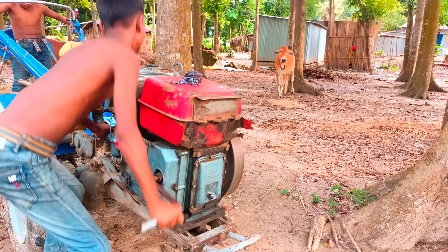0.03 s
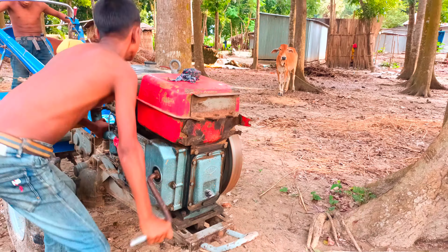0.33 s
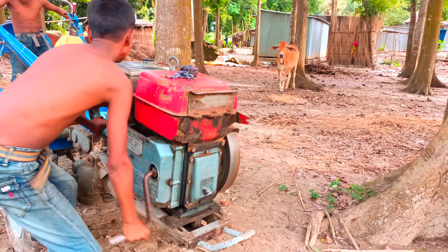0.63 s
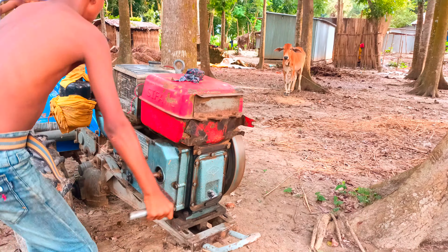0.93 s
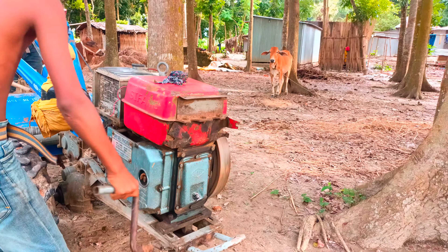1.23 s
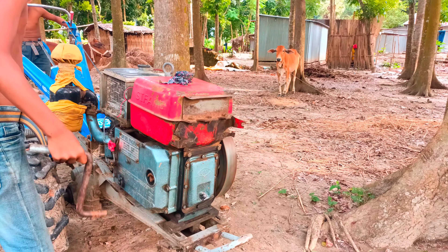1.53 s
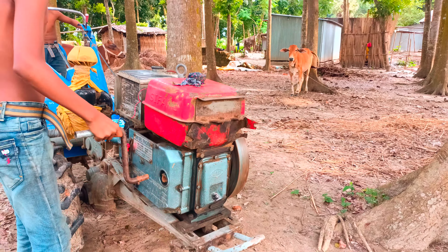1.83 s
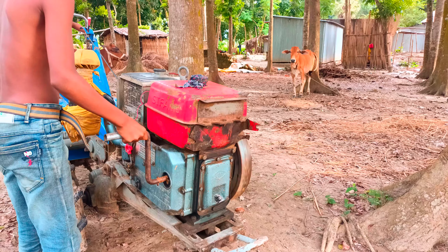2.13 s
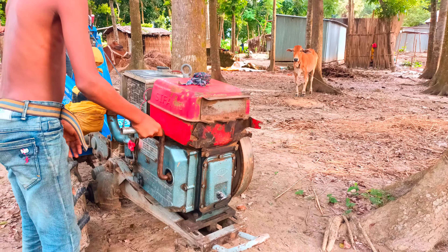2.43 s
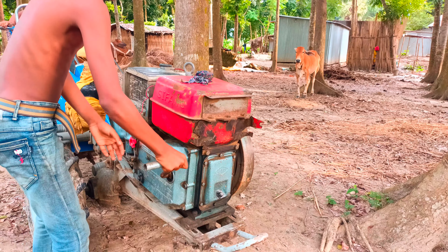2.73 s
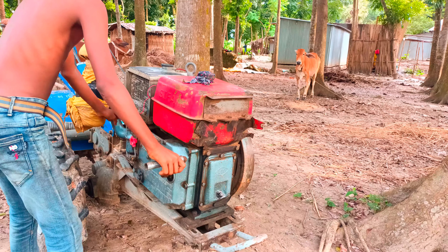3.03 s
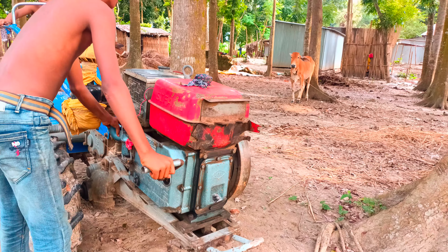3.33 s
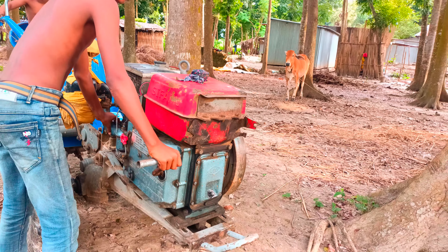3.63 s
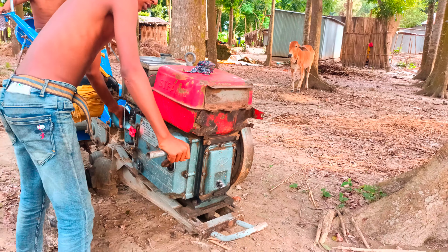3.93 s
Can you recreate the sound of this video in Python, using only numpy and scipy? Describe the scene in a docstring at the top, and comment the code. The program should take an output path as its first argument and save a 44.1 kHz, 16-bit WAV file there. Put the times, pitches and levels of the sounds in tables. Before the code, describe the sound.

Close up in a yard, a steel crank squeaks and knocks as it turns over an engine without starting it. The rumble fades, the crank is reseated with a ringing clack, and faint bird chirps and insect buzz remain.

```python
"""A dry hand crank squeals and chatters in its socket, turning a single-cylinder engine that does not fire.
Steel sticks and slips for the squeals; knocks rattle the socket and thud in the casing, which the gear
teeth shake into a rumble. The crank is pulled out, the flywheel runs down with a faintly singing bearing,
and the crank clacks back into place, ringing. In the village yard around it, insects buzz in fast pulses
and a small bird chirps in falling sweeps."""
import sys
import numpy as np
from scipy import signal
from scipy.fft import rfft, irfft
from scipy.io import wavfile

SR = 44100
rng = np.random.default_rng(int(sys.argv[2]) if len(sys.argv) > 2 else 0)


def to_wav(sig):
    """Store sig (one row per channel, or 1-D mono) as 16-bit WAV at the path in sys.argv[1].

    Samples outside -1..1 are clipped; the rate is SR.
    """
    pcm = np.clip(np.atleast_2d(sig), -1, 1) * 32767
    pcm = np.round(pcm).astype(np.int16)
    wavfile.write(sys.argv[1], SR, pcm.T)  # frames by channels


N = 176400
CONTACTS_PER_S = 2500


def from_db(db):
    """Decibels to gain."""
    return 10 ** (np.asarray(db) / 20)


def unit_rms(x):
    """Scale to unit power."""
    return x / np.sqrt(np.mean(x ** 2) + 1e-20)


def clock(size=N):
    """Sample times in seconds."""
    return np.arange(size) / SR


def at_hz(points, hz):
    """Read a table on a log-frequency axis."""
    table_hz, value = np.transpose(points)
    return np.interp(np.log(np.maximum(hz, 1)), np.log(table_hz), value)


def colour(x, spectrum, tilt_db_per_oct=0):
    """Apply a spectrum and a tilt; unit power."""
    hz = np.maximum(np.fft.rfftfreq(x.shape[-1], 1 / SR), 20)
    gain = from_db(at_hz(spectrum, hz) + tilt_db_per_oct * np.log2(hz))
    return unit_rms(irfft(rfft(x) * gain, x.shape[-1]))


def drift(corner_hz, shape):
    """Low-passed random wander; unit power."""
    hz = np.fft.rfftfreq(shape[-1], 1 / SR)
    return unit_rms(irfft(rfft(rng.standard_normal(shape)) / (1 + (hz / corner_hz) ** 2), shape[-1]))


def envelope(t, length_s, rise_s, fall_s):
    """Linear rise, hold until length_s, exponential fall."""
    return np.clip(t / rise_s, 0, 1) * np.exp(-np.maximum(t - length_s, 0) / fall_s)


def add(out, start_s, x):
    """Mix in a short sound."""
    i = max(int(start_s * SR), 0)
    out[:, i:i + x.shape[-1]] += x[..., :N - i]


def ring(x, hz, t60_s):
    """One mode as a two-pole resonator."""
    radius, angle = from_db(-60 / (t60_s * SR)), 2 * np.pi * hz / SR
    return signal.lfilter([0, np.sin(angle)], [1, -2 * radius * np.cos(angle), radius ** 2], x + 1e-18)


def body(x, modes):
    """Drive a table of modes in alternating polarity; unit power."""
    return unit_rms(sum((-1) ** i * from_db(db) * ring(x, hz, t60_s) / np.sqrt(t60_s)
                        for i, (hz, db, t60_s) in enumerate(modes)))


def contacts(per_s, size=N):
    """Random small impacts, of different strength at each ear."""
    return unit_rms((rng.random(size) < per_s / SR) * rng.standard_normal((2, size)))


def scatter(x, decay_s):
    """A fast-dying spray of reflections of x for each ear."""
    t = clock(SR // 20)
    spray = unit_rms(rng.standard_normal((2, len(t))) * np.exp(-t / decay_s)) / np.sqrt(len(t))
    return signal.fftconvolve(x, spray, axes=1)[:, :N]


# Likeness of the ears: (frequency [Hz], left-right correlation [0-1])
EAR_CORRELATION = [(25, 0.58), (65, 0.64), (130, 1), (450, 0.91), (1000, 0.61), (2000, 0.071),
                   (5000, 0.059), (15000, 0)]


def spread(pair):
    """Blend two unrelated signals so that the ears agree in the lows only."""
    correlation = at_hz(EAR_CORRELATION, np.fft.rfftfreq(N, 1 / SR))
    angle = np.arcsin(np.clip(correlation, -.99, .99)) / 2
    spectra = rfft(pair)
    return irfft(spectra * np.cos(angle) + spectra[::-1] * np.sin(angle), N)


# Outdoor hush: (frequency [Hz], level [dB])
AIR_SPECTRUM = [(25, 1.5), (70, -3), (130, -6.5), (400, -10), (900, -22), (1600, -25.5), (2200, -15),
                (2600, -14), (4000, -14.5), (5500, -14.5), (6500, -19.5), (12000, -27), (16000, -24)]


def air(hush_db=-57, tone_db=-76):
    """Outdoor hush with a faint, wavering far-off tone."""
    hush = spread(colour(rng.standard_normal((2, N)), AIR_SPECTRUM))
    tone = unit_rms(ring(rng.standard_normal((2, N)), hz=2196, t60_s=.017))
    return from_db(hush_db) * hush + from_db(tone_db + 3 * drift(3.4, (N,))) * tone


# Insect buzz: (frequency [Hz], level [dB])
INSECT_SPECTRUM = [(5000, -45), (6500, -12), (7400, -10.5), (8200, -6.5), (8800, -0.5), (9250, -3.5),
                   (9800, -10), (10900, -13), (12000, -18), (15000, -45)]


def insects(pulse_hz=327, buzz_db=-52, flutter_db=1.5, chorus_db=-55.5):
    """A high buzz of fast, slightly uneven pulses over the hiss of a farther chorus."""
    cycles = np.cumsum(pulse_hz * (1 + .005 * drift(60, (2, N))), axis=1) / SR
    pulses = sum(np.cos(2 * np.pi * (k * cycles + rng.random())) for k in range(22, 35))
    buzz = colour(pulses, INSECT_SPECTRUM) * from_db(flutter_db * drift(50, (2, N)))
    chorus = colour(rng.standard_normal((2, N)), INSECT_SPECTRUM)
    return from_db(buzz_db) * buzz + from_db(chorus_db) * chorus


# Near bird's notes: (time [s], start pitch [Hz], level [dB])
BIRD_NOTES = [(2.162, 5740, -43), (3.098, 6400, -50), (3.124, 6460, -45), (3.328, 5250, -51),
              (3.353, 5200, -53.5), (3.48, 5480, -49.5), (3.588, 6140, -39.5), (3.599, 5300, -44),
              (3.614, 5500, -38.5), (3.705, 5700, -44), (3.730, 5850, -38), (3.745, 5260, -40.5),
              (3.849, 6030, -46.5), (3.868, 5520, -38.5), (3.887, 5400, -37.5)]


def birds(note_s=.0167, drop_hz=1220, ear_phase_rad=2.24, scatter_db=3.5):
    """Quick falling notes, smeared by the trees; a farther bird chirps at random."""
    out, t = np.zeros((2, N)), clock(int(note_s * SR))
    far_notes = [(start_s, 5000, -55) for start_s in rng.uniform(1.35, 2.75, 12)]
    for start_s, start_hz, db in BIRD_NOTES + far_notes:
        hz = (start_hz - drop_hz * t / note_s) * (1 + .014 * drift(400, t.shape))
        phase = 2 * np.pi * np.cumsum(hz) / SR
        note = np.sin(np.pi * t / note_s) * np.sin([phase, phase - ear_phase_rad])
        add(out, start_s, from_db(db) * note)
    return out + from_db(scatter_db) * scatter(out, decay_s=.0061)


def yard_echo(x, t60_s=.27, gap_s=.004, lowpass_hz=4500):
    """Diffuse, dull echoes from trunks and sheds."""
    t = clock(SR // 2)
    tail = rng.standard_normal((2, len(t))) * from_db(-60 * t / t60_s) * (t > gap_s)
    tail = signal.sosfilt(signal.butter(1, lowpass_hz, fs=SR, output="sos"), tail)
    return signal.fftconvolve(x, unit_rms(tail) / np.sqrt(len(t)), axes=1)[:, :N]


# Deep rumble: (frequency [Hz], level [dB])
RUMBLE_SPECTRUM = [(25, -11.5), (55, -1), (80, -5.5), (120, -14.5), (250, -15), (600, -45), (4000, -81)]
# Course of the rumble: (time [s], level [dB])
RUMBLE_LEVELS = [(0, -68), (.7, -59), (1.2, -55), (1.5, -58), (2.3, -59.5), (2.9, -57), (3.149, -74),
                 (4, -72)]
# Dull bumps: (time [s], length [s], level [dB])
LOW_BUMPS = [(1.042, .03, -30.5), (1.769, 0.033, -40), (3.554, 0.031, -51.5)]


def rumble_and_bumps(bump_hz=78):
    """Deep noise with a few soft thumps, each a low tone plus a swell of that noise."""
    t = clock()
    rumble = spread(colour(rng.standard_normal((2, N)), RUMBLE_SPECTRUM))
    bump_gain = sum(from_db(db) * envelope(np.minimum(t - start_s, 1), length_s, .013, .0091)
                    for start_s, length_s, db in LOW_BUMPS)
    thump = np.sin(2 * np.pi * (bump_hz * t + rng.random())) + .49 * rumble
    return bump_gain * thump + from_db(np.interp(t, *np.transpose(RUMBLE_LEVELS))) * rumble


def bearing(start_s=2.176, level_db=-54.5):
    """A coasting bearing sings: light rubbing through one resonance."""
    tone = unit_rms(ring(spread(rng.standard_normal((2, N))), hz=1075, t60_s=.11))
    return from_db(level_db) * tone * envelope(clock() - start_s, length_s=.42, rise_s=.06, fall_s=.05)


# Steel contact: (frequency [Hz], level [dB])
STEEL_SPECTRUM = [(30, -71.5), (200, -25), (500, -10.5), (950, -0.5), (1500, -2), (2100, -1.5), (2750, 2.5),
                  (3600, -1), (5000, -1), (8500, -9), (12500, -14), (15500, -31.5)]
# Engine casing: (frequency [Hz], level [dB], t60 [s])
CASING_MODES = [(140.8, -5.5, 0.17), (192.3, -11, 0.11), (387, -9, 0.1), (461, -0.5, 0.17),
                (492, -1.5, 0.13), (565.3, -7.5, 0.0765), (798, -14, 0.14), (859, -8.5, 0.1205),
                (990, -13.5, 0.044), (1076, -21, 0.07), (1225, -10.5, 0.069), (1318, -15.5, 0.1)]
# Its crowded lesser modes: (frequency [Hz], level [dB])
WASH_SPECTRUM = [(30, -25.5), (70, -22), (130, -5), (350, -1.5), (700, -4.5), (1200, -4), (1500, -13),
                 (2400, -10.5), (5000, -20), (15000, -42.5)]
# Gear force, cranked and then running down: (time [s], level [dB])
GEAR_LEVELS = [(0, -32.5), (.5, -32), (.9, -32), (1.1, -34.5), (1.33, -43), (1.43, -47.5), (1.75, -46.5),
               (1.9, -50), (2.15, -50.5), (2.27, -51.5), (2.5, -50.5), (2.75, -56.5), (2.95, -71),
               (4, -70.5)]


def gears(teeth_per_s=1100, ticks_per_s=50, surge_db=2.5, modes_db=-1, wash_db=-5, tick_db=-13.5):
    """Meshing teeth shake the cast casing in uneven surges; loose parts tick."""
    force = from_db(np.interp(clock(), *np.transpose(GEAR_LEVELS)) + surge_db * drift(32, (N,)))
    modes = force.std() * body(force * spread(contacts(teeth_per_s)), CASING_MODES)
    wash = spread(colour(contacts(CONTACTS_PER_S), WASH_SPECTRUM))
    ticks = scatter(contacts(ticks_per_s)[:1], decay_s=.002)
    ticks = colour(ticks, STEEL_SPECTRUM, tilt_db_per_oct=-1.5)
    return from_db(modes_db) * modes + force * (from_db(wash_db) * wash + from_db(tick_db) * ticks)


def casing_thuds(knocks, lag_s=.00412, modes_db=1, wash_db=-5, highpass_hz=293):
    """The casing answers each knock a moment later."""
    t, force = clock(), np.zeros(N)
    for start_s, *_, thud_db in knocks:
        age_s = np.minimum(t - start_s - lag_s, .5)
        force += from_db(thud_db) * envelope(age_s, length_s=.022, rise_s=.013, fall_s=.014)
    modes = force.std() * body(force * spread(contacts(CONTACTS_PER_S)), CASING_MODES)
    wash = force * spread(colour(contacts(CONTACTS_PER_S), WASH_SPECTRUM))
    highpass = signal.butter(2, highpass_hz, "high", fs=SR, output="sos")
    return signal.sosfilt(highpass, from_db(modes_db) * modes + from_db(wash_db) * wash)


# Ringing crank: (frequency [Hz], level [dB], t60 [s])
CRANK_MODES = [(2550, -15, 0.089), (3410, -8.5, 0.062), (6800, -6.5, 0.067), (7670, 2.5, 0.11),
               (8840, 2, 0.055), (10400, -4.5, 0.043)]


def crank_seating(start_s=2.381, gain_db=-19, rise_s=.0025):
    """The steel crank rings as it seats."""
    out, t = np.zeros((2, N)), clock(SR // 5)
    for hz, db, t60_s in CRANK_MODES:
        tone = np.sin(2 * np.pi * (hz * t + rng.random((2, 1)) / 4))
        decay = envelope(t, rise_s, rise_s, fall_s=t60_s / np.log(1000))
        add(out, start_s, from_db(gain_db + db) * tone * decay)
    return spread(out)


# Short resonances of crank and socket: (frequency [Hz], level [dB], t60 [s])
SOCKET_MODES = [(861.7, -1.5, 0.21), (986, 1, 0.046), (1192, -4, 0.078), (1664, -0.5, 0.057),
                (2198, 0.5, 0.052), (2574, 5.5, 0.07), (2743, -5.5, 0.086), (3330, -7, .04),
                (4110, -11.5, 0.039), (4760, -3.5, .03), (5700, -22.5, .04), (6360, 6, 0.023)]
# Steel knocks and scrapes: (time [s], length [s], rattle [dB], tilt [dB/octave], casing thud [dB])
KNOCKS = [(0.022, 0.0097, -19.5, -3.5, -33.5), (0.117, .008, -36, -4, -29.5),
          (0.147, 0.0155, -36, -18, -37.5), (.171, 0.0016, -27.5, -5, -45),
          (0.242, 0.012, -23.5, -2.5, -34), (0.308, 0.0089, -22.5, -2, -39),
          (0.43, 0.012, -28, -6.5, -31.5), (0.523, 0.013, -21.5, -3.5, -35),
          (0.571, 0.015, -18, 0.5, -36.5), (0.779, 0.015, -24, -2, -40.5), (0.804, 0.0086, -18.5, 2, -49),
          (0.846, 0.0068, -22.5, -6, -27), (0.953, 0.016, -33, -5.5, -54),
          (1.021, 0.0049, -29, -4.5, -37.5), (1.174, 0.013, -27, -2, -37.5), (1.097, 0.071, -46, 0, -50),
          (1.192, 0.047, -36, 1, -45), (1.228, 0.035, -28.5, 3, -36.5), (1.266, 0.0091, -24, -7, -27.5),
          (1.364, 0.0063, -35.5, -14.5, -56), (1.513, 0.013, -41, -10, -39.5),
          (1.551, 0.086, -48.5, 6.5, -49.5), (1.681, 0.012, -32.5, -10, -34.5),
          (1.8, 0.015, -40.5, -10, -44), (1.964, 0.009, -38.5, -7, -37.5), (2.032, 0.013, -23, -2.5, -37.5),
          (2.082, 0.011, -24, 0.5, -38.5), (2.161, 0.019, -49, -6, -44), (2.311, 0.016, -29.5, 0, -31),
          (2.376, 0.017, -21.5, -1.5, -27), (2.684, .008, -31.5, -7, -37), (2.69, 0.0075, -24.5, -2, -33),
          (3.78, 0.013, -38.5, -0.5, -51)]


def crank_clacks(contacts_per_s=7000, socket_db=-8.5):
    """Each knock is a short rattle of tiny contacts that rings the socket."""
    out, t = np.zeros((2, N)), clock(SR // 5)
    for start_s, length_s, db, tilt, _ in KNOCKS:
        scrape = colour(contacts(contacts_per_s, len(t)), STEEL_SPECTRUM, tilt)
        rattle = scrape * envelope(t, length_s, rise_s=.0025, fall_s=.0051)
        ringing = body(rattle, SOCKET_MODES) * rattle.std()
        add(out, start_s, from_db(db) * (rattle + from_db(socket_db) * ringing))
    return spread(out)


# Squeal harmonics, fundamental first: (level [dB])
HARMONICS_DB = [-2, -5, -7.5, -16, -16.5, -28]
# Stick-slip squeals:
# (time [s], length [s], start pitch [Hz], end pitch [Hz], level [dB], roughness [0-1], tilt [dB/octave])
CRANK_SQUEALS = [(0.0, 0.024, 2778, 2574, -11.5, 0.65, -0.5), (0.034, .020, 3490, 3550, -23.5, 0, -6.5),
                 (.064, 0.015, 2330, 2380, -14, .08, 2), (.073, 0.01, 2400, 2610, -14, 0, -5.5),
                 (0.098, 0.016, 2700, 2760, -26, 0.19, 0.5), (0.27, 0.019, 2638, 2367, -12, 0.38, -0.5),
                 (0.282, 0.03, 2530, 2445, -10.5, 0.74, 2.5), (.310, 0.022, 3170, 3320, -21, 0.38, -7),
                 (0.342, 0.025, 2515, 2380, -13.5, 0.32, -1), (0.387, .016, 2693, 2150, -25.5, 0.65, 1),
                 (.478, 0.011, 2590, 2630, -21.5, 0.22, -2.5), (0.484, 0.012, 2436, 2346, -10, 0.31, 0.5),
                 (0.558, 0.025, 2857, 2602, -14, 0.8, 0.5), (.588, .027, 3450, 3430, -23.5, 0.22, -6.5),
                 (.627, 0.016, 2330, 2410, -16.5, 0.4, -1), (0.636, 0.019, 2415, 2570, -17, 0.28, -3.5),
                 (0.689, 0.016, 2910, 3030, -10.5, 0.35, -4), (0.701, 0.014, 3530, 3630, -18.5, 0.22, 1.5),
                 (.713, 0.021, 2770, 2700, -12.5, 0.6, 2.5), (0.731, .017, 2720, 2566, -19.5, 0.23, -5),
                 (.767, 0.012, 2236, 2290, -10.5, 0.3, 4), (0.891, 0.043, 2165, 2253, -28, 0.82, 0),
                 (1.155, 0.0179, 1603, 1577, -42, 0.4, 5.5), (1.284, 0.046, 2213, 2630, -27, 0.12, 3),
                 (2.036, 0.011, 2640, 2760, -28, 0.3, 3.5)]


def crank_squeals(wobble=.022, chatter=.085, flicker_db=5.6, rasp_db=-3, fall_s=.0036):
    """Dry steel sticks and slips: a gliding harmonic tone that breaks into rasp as it gets rough."""
    out, t = np.zeros((2, N)), clock(SR // 10)
    k = np.arange(len(HARMONICS_DB))[:, None] + 1
    for start_s, length_s, start_hz, end_hz, db, roughness, tilt in CRANK_SQUEALS:
        hz = np.interp(t, [0, length_s], [start_hz, end_hz]) * (1 + wobble * drift(100, t.shape))
        hz = hz * (1 + chatter * roughness * drift(600, (2, 1, len(t))))
        cycles = k * np.cumsum(hz, axis=-1) / SR + rng.random((len(k), 1))
        ear_offset_cycles = .23 * rng.standard_normal((2, len(k), 1))
        phase = 2 * np.pi * (cycles + ear_offset_cycles)
        tilted_db = np.array(HARMONICS_DB)[:, None] + tilt * np.log2(k)
        gains = from_db(tilted_db + flicker_db * drift(130, phase.shape))
        tone = unit_rms((gains * np.sin(phase)).sum(axis=1))
        rasp = colour(contacts(CONTACTS_PER_S, len(t)), STEEL_SPECTRUM, tilt + 5)
        squeal = unit_rms(tone + roughness * from_db(rasp_db) * rasp)
        swell = envelope(t, length_s - fall_s, rise_s=.19 * length_s, fall_s=fall_s)
        add(out, start_s, from_db(db) * squeal * swell)
    return out


def scene(left_lag_s=.00009, echo_db=-19):
    """The engine close by, a little to the right, and the yard around it."""
    crank = crank_squeals() + crank_clacks() + crank_seating()
    left, right = crank + casing_thuds(KNOCKS) + gears() + bearing()
    engine = np.array([np.roll(left, int(left_lag_s * SR)), right])
    return engine + from_db(echo_db) * yard_echo(engine) + rumble_and_bumps() + birds() + insects() + air()


# Microphone port colour: (frequency [Hz], left minus right [dB])
PORT_BALANCE = [(100, -1.5), (300, 0), (470, 6.5), (800, -5), (1200, 2), (2200, 0.5), (3600, 1.5),
                (5500, 4.5), (7200, -19), (9000, -2.5), (11000, 8), (13000, 3.5), (15500, -4)]


def record(dry, cutoff_hz=15900):
    """Each microphone port has its own colour; peaks are rounded and the top is cut."""
    balance_db = at_hz(PORT_BALANCE, np.fft.rfftfreq(2 * N, 1 / SR))
    gains = from_db(np.array([balance_db, -balance_db]) / 2)
    gains /= np.sqrt(np.mean(gains ** 2, axis=0))
    coloured = irfft(rfft(dry, 2 * N) * gains)[:, :N]
    lowpass = signal.ellip(12, .1, 80, cutoff_hz, fs=SR, output="sos")
    return signal.sosfilt(lowpass, np.tanh(coloured))


dry = scene()
out = record(dry)
to_wav(out)
```